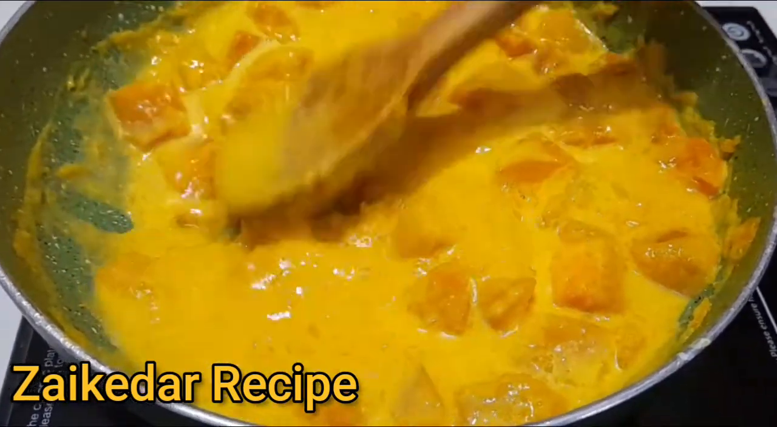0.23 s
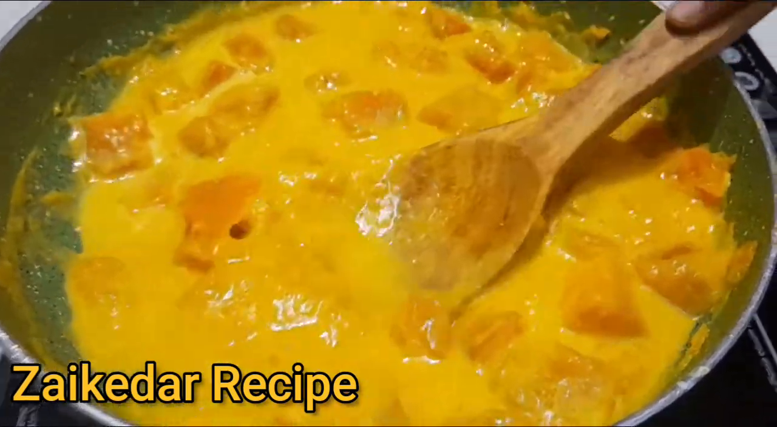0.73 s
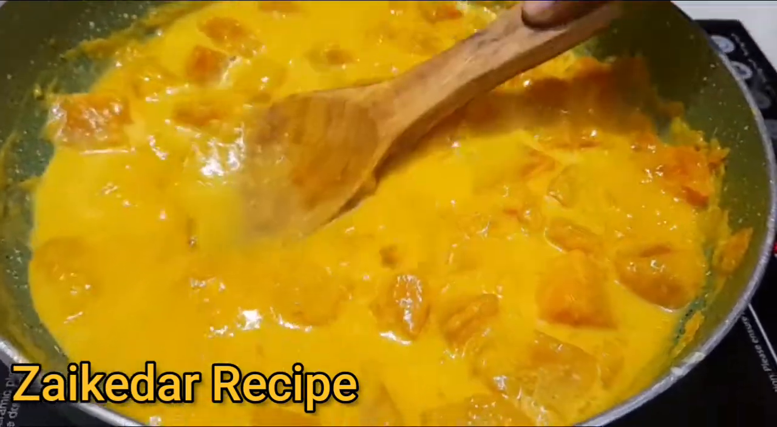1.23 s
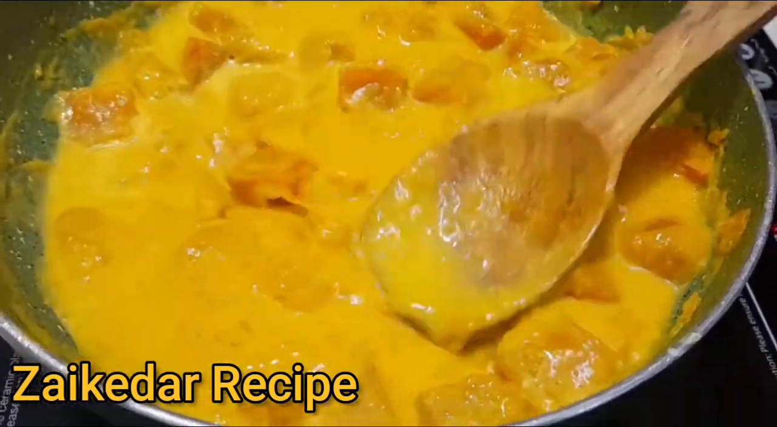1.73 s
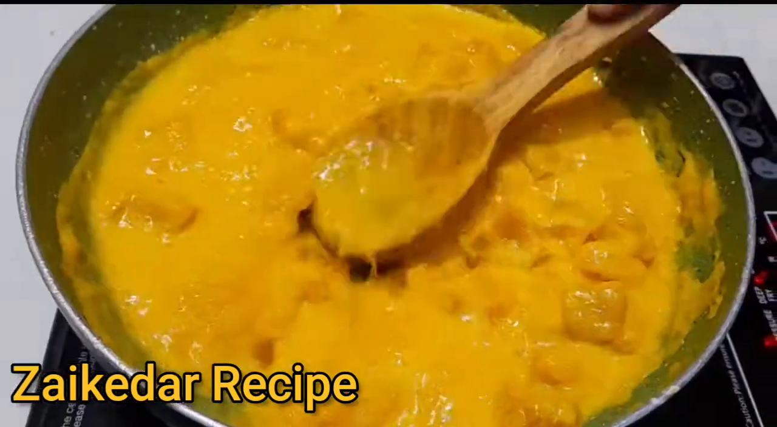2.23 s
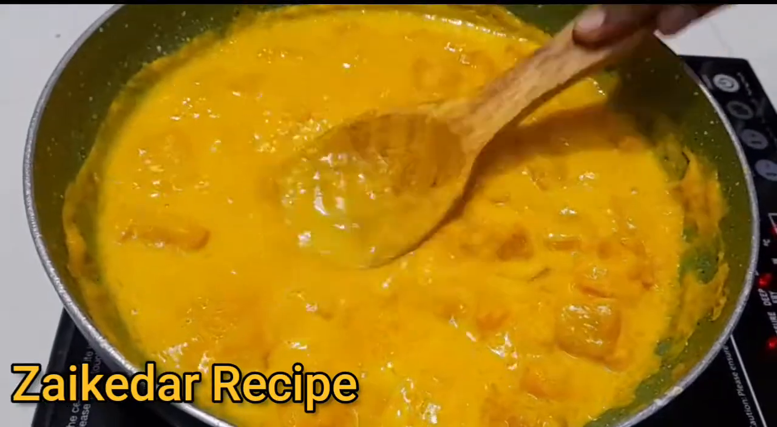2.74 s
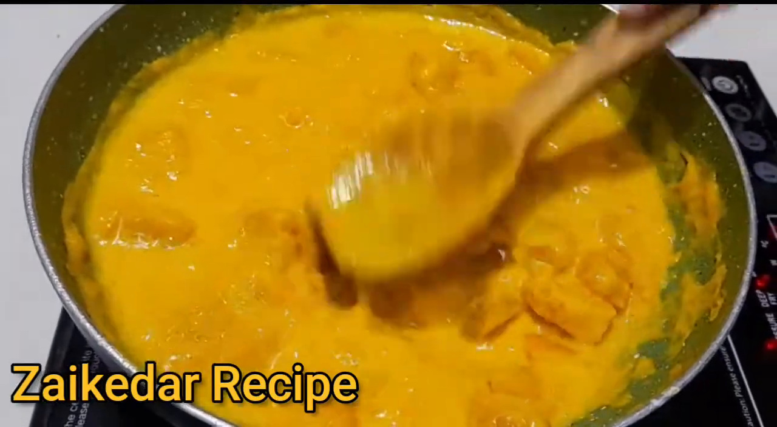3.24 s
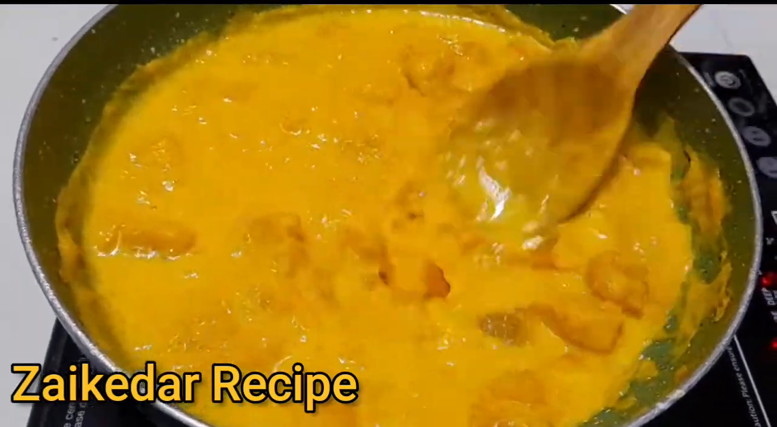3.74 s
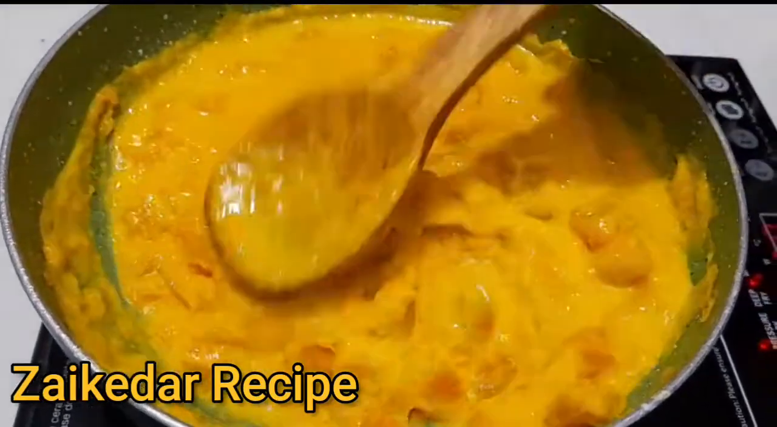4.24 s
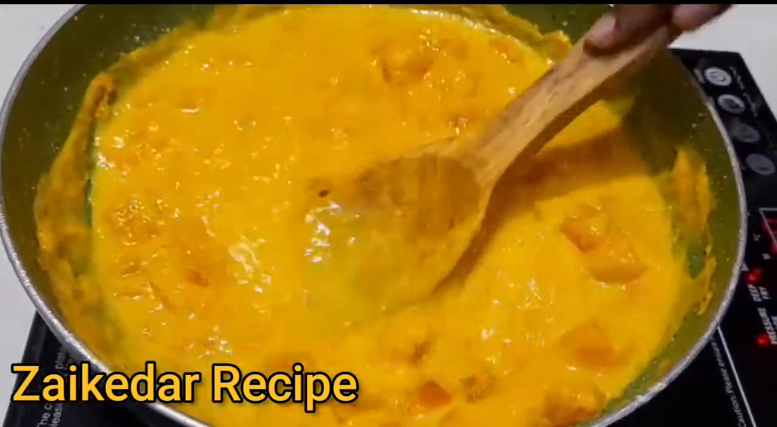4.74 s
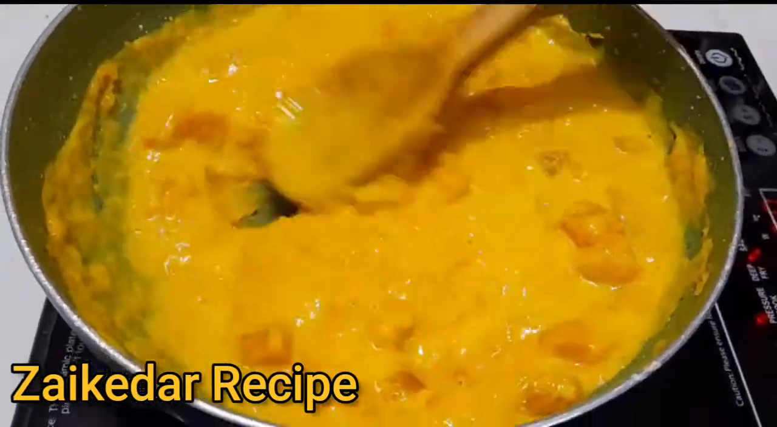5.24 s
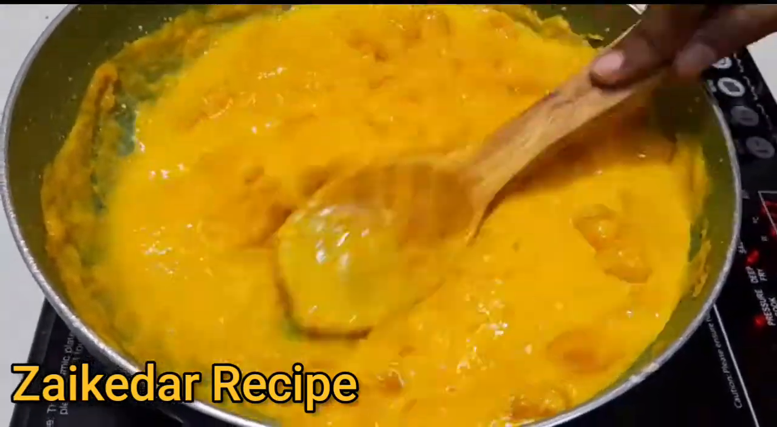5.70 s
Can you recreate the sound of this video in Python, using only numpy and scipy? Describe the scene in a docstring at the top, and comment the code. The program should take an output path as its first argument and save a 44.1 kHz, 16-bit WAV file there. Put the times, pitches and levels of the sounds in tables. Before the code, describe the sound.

A steady low drone and airy hiss come from a cooktop fan, heard up close in a kitchen. A wooden spoon bumps the pan once, clicks twice and moves through gently bubbling sauce with quiet ticks and squelches. After a split-second dropout the fan returns, and the stirring goes on with a small falling plop and a few more light taps. A thin electrical whine stays faintly in the background.

```python
"""From the start, an induction cooktop's fan rushes and sings over a low hum, beside a phone with two
microphone ports, while the coil whines faintly. Tiny bubbles crackle in the sauce, which ticks under a
wooden spoon that bumps and clicks on the pan. Near 1.9 s the sound drops out briefly. When it returns,
the phone lies differently and its right port is no longer muffled. Near 4.1 s an air pocket closes
behind the spoon, and the stirring and the fan go on to the end."""
import sys
import numpy as np
from scipy import signal
from scipy.fft import rfft, irfft, next_fast_len
from scipy.io import wavfile
from scipy.ndimage import uniform_filter1d

SR = 44100
rng = np.random.default_rng(int(sys.argv[2]) if len(sys.argv) > 2 else 0)


def pcm_store(signal):
    """Save signal as 16-bit PCM."""
    levels = np.round(np.clip(np.atleast_2d(signal), -1, 1) * 32767)
    wavfile.write(sys.argv[1], SR, levels.astype(np.int16).T)


N = 263277
T = np.arange(N) / SR

# "Before" and "after" always mean before and after the dropout.
DROP_S, BACK_S, FADE_IN_S, TAIL_S = 1.874, 1.957, .007, .024

# coil tone, with a side tone above and below caused by the mains power:
# (pitch [Hz], left before [dB], right before [dB], left after [dB], right after [dB])
COIL_TONES = [(15150, -80, -78, -78, -80), (14947, -87, -93, -82, -86), (15353, -84, -94, -82, -88)]
# sizzle around the coil tone: (time [s], left level [dB], right level [dB])
COIL_SIZZLE = [(0, -64, -92), (1.9, -66, -91), (1.95, -67, -78), (3.9, -68, -76), (4.3, -61, -70),
               (5.97, -63, -72)]
# fine crackle of bubbles: (time [s], left level [dB], right level [dB])
CRACKLE_LEVELS = [(0, -72, -85), (1.9, -69, -87), (1.96, -71, -70), (4, -70, -70), (5.3, -68, -73),
                  (5.97, -70, -69)]
# closing air pockets: (time [s], length [s], first pitch [Hz], last pitch [Hz], peak level [dB])
AIR_POCKETS = [(4.09, 0.085, 790, 570, -35.5)]
# short noise bursts (sauce ticks, squelches and the snap of the spoon on the pan):
# (time [s], low edge [Hz], high edge [Hz], fade time [s], left strength [dB], right strength [dB])
NOISE_BURSTS = [(.328, 3000, 12000, .002, -47, -60), (.505, 10000, 14500, .003, -54, -70),
                (.75, 10500, 12200, .015, -58, -72), (1.1, 9000, 14000, .01, -58, -72),
                (1.548, 11500, 14800, .006, -58, -72), (1.0441, 5200, 15500, 0.0015, -38, -62),
                (1.0437, 1800, 4200, .0018, -31, -23), (1.0928, 1900, 3200, .0028, -31, -28),
                (1.0958, 9000, 14200, .0015, -42, -62), (1.0925, 9000, 14200, .002, -42, -61),
                (2.19, 4500, 7500, .0052, -49, -55), (2.30, 11000, 15000, .012, -59, -53),
                (2.34, 4700, 6200, 0.028, -54, -47), (2.47, 5500, 6740, .03, -59, -53),
                (2.6955, 6500, 10500, 0.004, -47, -53), (2.7415, 6000, 11500, 0.003, -47, -49),
                (2.7445, 10500, 15500, .002, -45, -47), (2.7495, 5500, 10500, 0.0021, -42, -49),
                (2.81, 6160, 7100, 0.024, -61, -51), (3.225, 10000, 15500, .014, -60, -50),
                (3.61, 8980, 15500, .004, -55, -55), (4.591, 10500, 15000, .004, -48, -48),
                (4.7025, 5700, 15600, .003, -43, -51), (5.12, 10500, 15500, .012, -59, -52),
                (5.166, 4000, 6500, 0.003, -39, -41), (5.1665, 6500, 15690, 0.0027, -38, -54),
                (5.7, 4500, 7160, .02, -50, -51), (5.757, 4510, 6980, .002, -47, -50)]
# hollows in the ports that colour the bursts: (pitch [Hz], width [Hz], gain of the added ring [dB])
PORT_HOLLOWS = [(7100, 910, -1), (9850, 650, -2.5), (13200, 1200, 1.5)]
# dull spoon bumps: (time [s], strength [dB], pitch [Hz], time to fade by 60 dB [s])
SPOON_BUMPS = [(.506, -11, 212, 0.026)]
# spoon clicks: (time [s], left strength [dB], right strength [dB], brightness [dB per octave])
SPOON_CLICKS = [(1.0443, -26, -32, 4), (1.0933, -35, -29, -20), (2.7395, -42, -37, 0),
                (4.6553, -35, -23, -22)]
# ringing notes of the wet pan: (pitch [Hz], relative level [dB], time to fade by 60 dB [s])
PAN_NOTES = [(3310, -0.5, 0.017), (3550, 2, 0.014), (4000, -4, .01), (4420, 2, 0.012), (4930, -4, 0.016),
             (5630, -9, .009)]
# chance rises and dips in the level of a low 144 Hz hum: (time [s], level [dB])
HUM_LEVELS = [(0, -40), (.14, -29), (.3, -41.5), (.58, -41), (.66, -30), (.74, -37.5), (.8, -48),
              (1.0, -38), (1.35, -39.5), (1.7, -43.5), (2.15, -43.5), (2.35, -35), (2.5, -59), (2.7, -43),
              (2.77, -29), (3.2, -47.5), (3.75, -34), (4.5, -41), (5.1, -37), (5.55, -43), (5.8, -39.5)]
# rushing air: (frequency [Hz], left base level [dB per Hz], right base level [dB per Hz])
AIR_BEFORE = [(30, -79, -78), (69.4, -63.5, -66.5), (202, -66, -63), (447, -68, -67), (620, -70, -68.5),
              (1270, -66, -67.5), (1690, -74, -70.5), (3260, -81, -77), (4860, -86, -87.5),
              (6900, -94.5, -115.0), (7600, -94.5, -117.0), (9000, -95.0, -117.0), (12500, -98, -106.0),
              (15700, -99.5, -109.0)]
AIR_AFTER = [(30, -76, -76), (70.4, -64, -66), (187, -64.5, -63), (443, -69, -67), (620, -68.5, -69),
             (1260, -71, -69.5), (1770, -73, -71), (3270, -85.5, -77.5), (4780, -88, -81),
             (6680, -96, -87.5), (7530, -98, -97), (8800, -98.5, -103.0), (12500, -98, -96),
             (15700, -101, -100)]
# case, pan and ports colour the air: (frequency [Hz], width [Hz], boost before [dB], boost after [dB])
RESONANCES = [(108, 53, 8.5, 8.5), (143, 41, 8.5, 9), (237.7, 21, 7, 3.5), (292, 97, 2, 4.5),
              (333.4, 81, 6.5, 9), (526, 95, 3, 2), (590, 45, -1.5, -3.5), (627, 81, 1.5, 0),
              (732, 90, 5, 3.5), (800, 45, 6.5, 7), (861, 244, 0, 6.5), (1112, 180, -1.5, 4),
              (1384, 105, 1, 4.5), (2590, 610, 3, 2.5), (3870, 840, 4, 6.5), (4850, 220, 3.5, 1.5),
              (7090, 600, 2, 6), (9830, 550, 4.5, 3.5)]
# how alike the left and right hiss sound; the high hiss is nearly identical on both sides after the
# dropout: (frequency [Hz], likeness before [0-1], likeness after [0-1])
LEFT_RIGHT_LIKENESS = [(40, 0.9, 1), (70, 1, 1), (151, 0.97, 0.98), (460, 0.6, 0.76), (706, 0.92, 0.85),
                       (910, 0.34, 1), (1185, 0.39, 0), (1680, 0, 0.44), (1910, 0, 0), (3480, 0, 0.28),
                       (5940, 0, 0), (6800, .08, 0.77), (8100, .06, .6), (8500, .06, 0.36),
                       (10300, .06, 0.4), (10700, .12, 0.97), (14300, .15, 0.94), (15100, .1, 0)]
# throbbing of the hiss: (beats per turn of the fan shaft [count], depth [0-1])
SHAFT_THROB = [(1, .065), (2, .052), (4, .087)]

SHAFT_HZ, HUM_HZ, BLADE_BEFORE_HZ, BLADE_AFTER_HZ = 23.54, 144.1, 280.8, 281.3
PORT_LAG_S, OPPOSED_HZ = .00018, (1160, 5740)  # in this range one port is pushed as the other is pulled
ECHO_RIPPLE_DB, ECHO_SPACING_HZ = 2, 71.56
BUBBLES_PER_S, BUBBLE_SPREAD_DB, BUBBLE_FADE_S = 220, 2.5, .0018


def gain(db):
    """Turn decibels into a number to multiply by."""
    return 10 ** (np.asarray(db) / 20)


def curve(hz, at_hz, values):
    """Join values with straight lines on a scale of octaves."""
    return np.interp(np.log(hz + 1), np.log(at_hz), values)


def stereo_levels(table):
    """Left and right levels in dB, sliding from row to row over time."""
    times, *sides = np.transpose(table)
    return np.array([np.interp(T, times, db) for db in sides])


def before_after(before, after):
    """Switch from one (left, right) pair to another when the sound returns."""
    return np.where(T < BACK_S, np.reshape(before, (2, 1)), np.reshape(after, (2, 1)))


def wander(per_s):
    """A smooth random wiggle, about 1 in size, that takes per_s steps a second."""
    hold = int(SR / per_s)
    steps = np.repeat(rng.standard_normal(N // hold + 1), hold)
    return 1.313 * uniform_filter1d(uniform_filter1d(steps, hold), hold)[:N]


def band(sound, low_hz, high_hz):
    """Keep what lies between two frequencies."""
    return signal.sosfilt(signal.butter(4, [low_hz, high_hz], "bandpass", fs=SR, output="sos"), sound)


def add(out, start_s, sound):
    """Mix a sound in at the given time."""
    i = int(start_s * SR)
    out[:, i:i + sound.shape[-1]] += sound[..., :N - i]


def tone(hz, db, wobble_hz, flicker_db, wobbles_per_s=14, flickers_per_s=16):
    """A pure tone whose pitch wobbles and whose level flickers at random."""
    phase = 2 * np.pi * np.cumsum(hz + wobble_hz * wander(wobbles_per_s)) / SR
    return np.sqrt(2) * gain(db + flicker_db * wander(flickers_per_s)) * np.sin(phase)


def coil_whine():
    """The coil's fast-switching current makes thin, high tones inside a gritty sizzle."""
    whine = 0
    for hz, *db in COIL_TONES:
        level_db = before_after(db[:2], db[2:])
        whine += tone(hz, level_db, wobble_hz=4, flicker_db=2.5, wobbles_per_s=20, flickers_per_s=12)
    sizzle = band(rng.standard_normal(N), 14900, 15900)
    return whine + sizzle / sizzle.std() * gain(stereo_levels(COIL_SIZZLE) + 1.8 * wander(45))


def bubble_crackle():
    """Tiny bubbles burst at random in the sauce, each a short puff of high hiss."""
    bursts = rng.random(N) < BUBBLES_PER_S / SR
    pops = bursts * gain(BUBBLE_SPREAD_DB * rng.exponential(size=N))
    puffs = signal.lfilter([1], [1, -np.exp(-1 / (BUBBLE_FADE_S * SR))], pops)
    fizz = band(puffs * rng.standard_normal((2, N)), 9000, 15500)
    return fizz / fizz.std() * gain(stereo_levels(CRACKLE_LEVELS))


def air_pocket():
    """A pocket of air collapses behind the spoon: a short tone swells as its pitch sags ever faster."""
    out = np.zeros((2, N))
    for start_s, length_s, first_hz, last_hz, db in AIR_POCKETS:
        progress = np.arange(int(length_s * SR)) / (length_s * SR)
        hz = first_hz + (last_hz - first_hz) * progress ** 1.5
        swell = np.sin(np.pi * progress ** 2)
        add(out, start_s, gain(db) * swell * np.sin(2 * np.pi * np.cumsum(hz) / SR))
    return out


def ticks_and_snaps():
    """Sauce ticks, squelches and the spoon's snap on the pan: noise bursts that ring in the ports."""
    out, t = np.zeros((2, N)), np.arange(int(.12 * SR)) / SR
    for start_s, low_hz, high_hz, fade_s, *db in NOISE_BURSTS:
        rise_s = .6 * fade_s * min(fade_s / .006, 1)  # short bursts snap, long squelches start softly
        shape = np.minimum(t / rise_s, np.exp((rise_s - t) / fade_s))
        burst = band(rng.standard_normal(len(t)) * shape, low_hz, high_hz)
        burst *= np.sqrt(np.sum(shape ** 2) / np.sum(burst ** 2))  # make up the energy filtered away
        opposed = OPPOSED_HZ[0] < low_hz and high_hz < OPPOSED_HZ[1]
        sides = gain(db) * [1, -1 if opposed else 1]
        add(out, start_s, sides[:, None] * burst)
    return out + sum(gain(db) * signal.lfilter(*signal.iirpeak(hz, hz / width, fs=SR), out)
                     for hz, width, db in PORT_HOLLOWS)


def spoon_bump():
    """The spoon bumps the pan: two low notes that die away at once."""
    out, t = np.zeros((2, N)), np.arange(int(.12 * SR)) / SR
    for start_s, db, hz, ring_s in SPOON_BUMPS:
        shape = gain(-60 * t / ring_s) * (1 - np.exp(-t / .0021))
        phase = 2 * np.pi * hz * t
        add(out, start_s, -gain(db) * shape * (np.sin(phase) + .5 * np.sin(2.32 * phase)))
    return out


def spoon_clicks():
    """Each click of the spoon sets all the notes of the wet pan ringing briefly."""
    out, t = np.zeros((2, N)), np.arange(int(.03 * SR)) / SR
    hz, note_db, ring_s = np.transpose(PAN_NOTES)[:, :, None]
    onset = np.minimum(t / .00015, 1)
    for start_s, left_db, right_db, brightness in SPOON_CLICKS:
        shapes = gain(note_db + brightness * np.log2(hz / hz[0]) - 60 * t / ring_s)
        head_start = .2 * rng.random(hz.shape)  # the notes begin nearly in step
        ring = np.sum(shapes * np.sin(2 * np.pi * (hz * t + head_start)), axis=0)
        add(out, start_s, gain([left_db, right_db])[:, None] * ring * onset)
    return out


def hum_and_blades():
    """Over an uneven low hum, the blades sing a tone and an overtone; the tone comes back louder."""
    hum = tone(HUM_HZ, np.interp(T, *np.transpose(HUM_LEVELS)), wobble_hz=2.495, flicker_db=1.5)
    blade = np.where(T < BACK_S, tone(BLADE_BEFORE_HZ, db=-41.3, wobble_hz=.8, flicker_db=1.3),
                     tone(BLADE_AFTER_HZ, db=-40.1, wobble_hz=2.8, flicker_db=1))
    overtone_db = before_after((-51, -61), (-58, -59))
    return hum + blade + tone(4 * BLADE_BEFORE_HZ, overtone_db, wobble_hz=3.5, flicker_db=3)


def air_spectrum(table, hz, position):
    """Left and right rushing noise, frequency by frequency; the phone's position is 0 before, 1 after."""
    at_hz, left_db, right_db = np.transpose(table)
    boost = 1 + sum((gain(db[position]) ** 2 - 1) / (1 + (2 * (hz - centre) / width) ** 2) ** 2
                    for centre, width, *db in RESONANCES)
    likeness_hz, *likeness = np.transpose(LEFT_RIGHT_LIKENESS)
    alike = curve(hz, likeness_hz, likeness[position])
    # the right port hears the shared noise late in the lows and upside down in the opposed range
    delay = np.exp(-2j * np.pi * hz * PORT_LAG_S)
    shift = np.select([hz < OPPOSED_HZ[0], hz < OPPOSED_HZ[1]], [delay, -1], 1)
    shared, own = rfft(rng.standard_normal((2, next_fast_len(N))))
    left = gain(curve(hz, at_hz, left_db)) * shared
    right = gain(curve(hz, at_hz, right_db)) * (alike * shift * shared + np.sqrt(1 - alike ** 2) * own)
    # echoes off the counter and walls make small peaks and dips above 1000 Hz
    ripple_hz = np.arange(0, SR / 2 + 200, ECHO_SPACING_HZ)
    ripple_db = ECHO_RIPPLE_DB * rng.standard_normal((2, 400))[:, :len(ripple_hz)]
    ripple = [gain(np.interp(hz, ripple_hz, db) * (hz > 1000)) for db in ripple_db]
    return np.array([left, right]) * ripple * np.sqrt(np.maximum(boost, 0) * SR / 2)


def fan_air():
    """Air rushes through the case, flickering a little; its hiss throbs with each turn of the shaft."""
    shaft_angle = 2 * np.pi * np.cumsum(SHAFT_HZ + .2 * wander(1.9)) / SR
    throb = 1 + sum(depth * np.cos(beats * shaft_angle) for beats, depth in SHAFT_THROB)
    hz = np.fft.rfftfreq(next_fast_len(N), 1 / SR)
    before, after = air_spectrum(AIR_BEFORE, hz, position=0), air_spectrum(AIR_AFTER, hz, position=1)
    band_number = np.maximum(np.log2((hz + 1) / 62.5) / 2, 0)  # bands lie two octaves apart
    out, swell_db = 0, .45 * wander(1.5)
    for k in range(5):
        share = np.maximum(1 - abs(band_number - k), 0)
        rush = np.where(T < DROP_S + TAIL_S, irfft(before * share)[:, :N], irfft(after * share)[:, :N])
        out += rush * gain(swell_db + .75 * wander(9)) * (throb if k > 1 else 1)
    return out


def scene():
    """The fan, the coil and the stirred pan together."""
    cooktop = fan_air() + hum_and_blades() + coil_whine()
    return cooktop + ticks_and_snaps() + spoon_bump() + air_pocket() + spoon_clicks() + bubble_crackle()


def record(dry):
    """The sound cuts out with a faint, dull tail and fades back in; the very highest treble is removed."""
    gate = np.where(T < DROP_S, 1, np.clip((T - BACK_S) / FADE_IN_S, 0, 1) ** 2)
    tail_fade = (T >= DROP_S) * gain(-9) * np.clip((DROP_S + TAIL_S - T) / .019, 0, 1)
    tail = band(np.diff(dry, prepend=0), 250, 4300) * tail_fade
    treble_cut = signal.ellip(14, .2, 60, 15730, fs=SR, output="sos")
    return signal.sosfilt(treble_cut, dry * gate + tail)


dry = scene()
out = record(dry)
pcm_store(out)
```